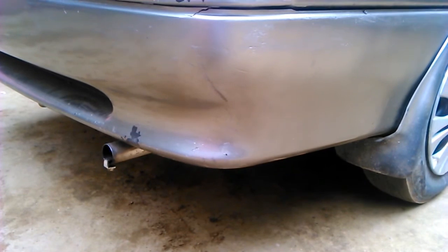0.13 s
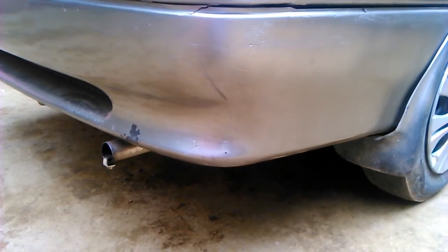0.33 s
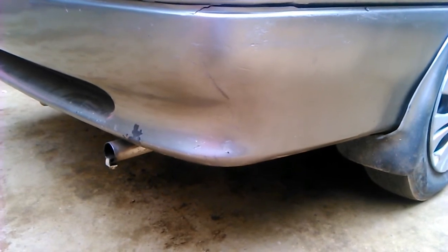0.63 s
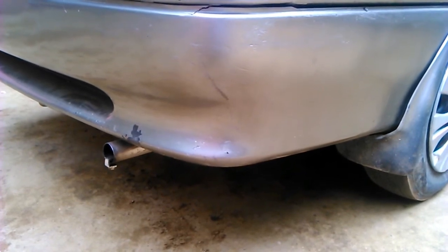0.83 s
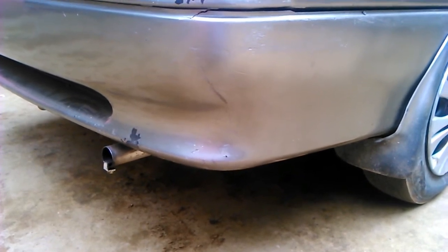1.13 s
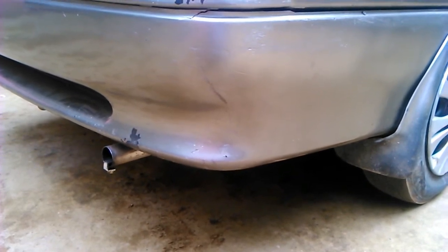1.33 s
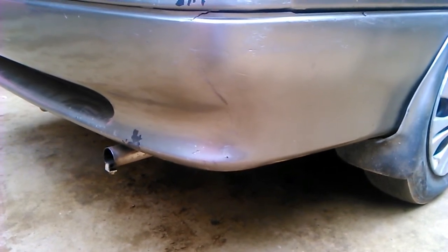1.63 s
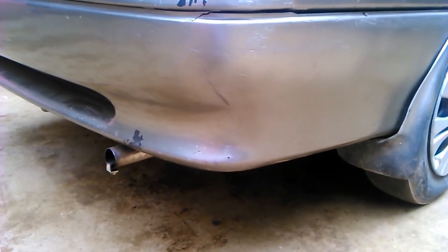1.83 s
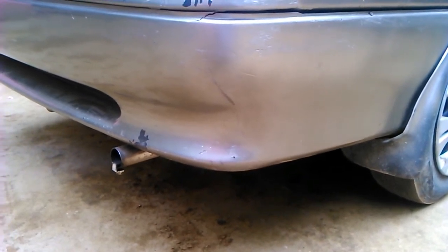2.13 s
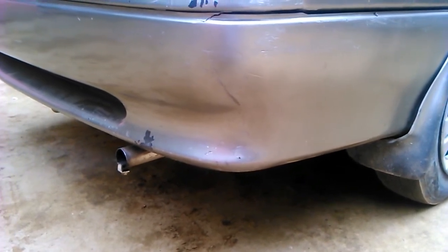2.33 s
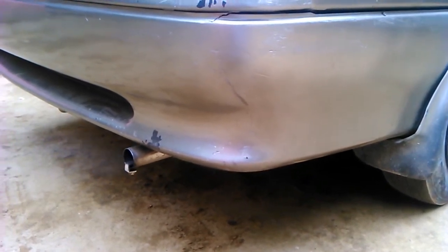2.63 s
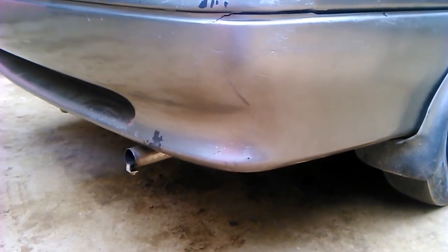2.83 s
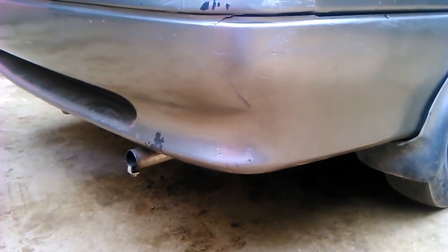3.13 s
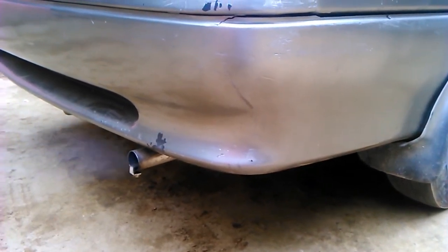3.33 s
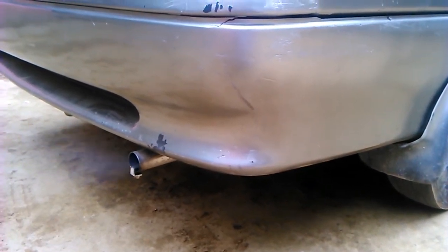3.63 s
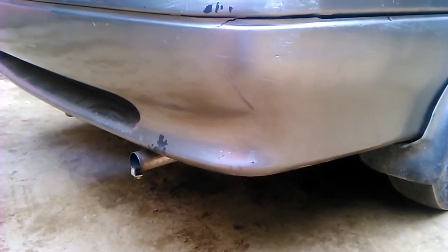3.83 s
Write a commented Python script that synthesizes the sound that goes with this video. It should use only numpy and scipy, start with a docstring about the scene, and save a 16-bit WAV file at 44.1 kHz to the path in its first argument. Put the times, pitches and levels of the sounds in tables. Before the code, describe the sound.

Close outdoors at a tailpipe, a four-cylinder engine revs in repeated bursts; a shrill, breathy, throbbing whistle swells over the rumble, with sputtering chirpy puffs and hissing gas in between, later bursts louder.

```python
"""Outdoors, close microphone: a four-cylinder car revs in short bursts, a whistle in the end of its tailpipe.
With the throttle open the gas jet blows the whistle steadily, throbbing at the firing rate; with it shut,
single uneven firings puff through, each a short chirp with a low thump. The whistle is an edge tone with
a breathy skirt, the engine a stack of sines on the firing rate, the gas noise coloured by the pipe.
A small metallic tick with a fading rustle falls in between."""
import sys
import numpy as np
from scipy import signal
from scipy.fft import rfft, irfft
from scipy.io import wavfile
from scipy.ndimage import uniform_filter1d

SR = 44100
rng = np.random.default_rng(int(sys.argv[2]) if len(sys.argv) > 2 else 0)


def output_pcm(signal):
    """Save a mono or channel-first signal as 16-bit PCM at the path in sys.argv[1].

    Samples are clipped to [-1, 1] before scaling.
    """
    pcm = np.clip(np.atleast_2d(signal).T, -1, 1) * 32767
    wavfile.write(sys.argv[1], SR, np.round(pcm).astype(np.int16))


N = 176400

# Colour of the low and of the high hiss, silent outside: [f/Hz, relative density/dB]
LOW_HISS_COLOUR = [(150, -7), (430, -1.5), (1080, 0), (2100, -0.5), (5000, -17.5)]
HIGH_HISS_COLOUR = [(1700, -0.5), (3000, 1.5), (4200, 0), (5400, -11), (7500, -4.5), (10500, -7),
                    (14500, -18)]
# Resonances of the pipe in both hisses: [f/Hz, width/Hz, lift/dB]
PIPE_RESONANCES = [(733, 122, 7), (1073, 89, 15), (1310.5, 67, 13), (3168, 95, 11), (6040, 1220, 12),
                   (11830, 780, 5.5)]
# The pipe rings on as the gas ebbs: [f/Hz, level over the low hiss/dB]
AFTER_RINGS = [(752, -10), (1360, -7), (1672, -3), (2360, -7), (2810, -8), (3420, -11)]
# Firing of the engine: [t/s, firing rate f/Hz, level of the firing tone/dB]
FIRING = [(0, 50.8, -28), (.13, 73.4, -28), (.25, 88.5, -34), (.3, 87.1, -33.5), (.6, 67.47, -32.5),
          (1.01, 125.6, -23), (1.33, 99.34, -27), (1.7, 70.8, -34.5), (2.03, 62.9, -30.5),
          (2.5, 141.7, -20), (2.54, 135.7, -15), (2.9, 99.4, -25.5), (3.13, 130.4, -20.5),
          (3.34, 153.5, -21.5), (3.38, 149.3, -13.5), (3.62, 121.7, -16.5), (3.81, 103.1, -25),
          (4, 128.3, -22.5)]
# 2nd, 3rd and 4th multiple of the firing rate, for a firing tone of -26.5 dB: [level before silencer/dB]
FIRING_OVERTONES = [-29.5, -35, -39.5]
# Colour that the silencer gives the overtones and quarter orders: [f/Hz, level/dB]
SILENCER = [(20, -7), (80, -6.5), (130, 1), (165, 5), (195, -3), (250, -6.5), (420, -18.5)]
# Lone firings with the throttle shut: [t/s, strength/dB, chirp pitch f/Hz once CHIRP_DECAY_S has passed]
LONE_FIRINGS = [(0.3104, -30, 3870), (0.3596, -24.5, 3330), (0.4016, -18.5, 3550), (0.4474, -19, 3460),
                (0.4942, -27.5, 3700), (0.554, -33.5, 3700), (1.52, -32, 3760), (1.762, -37, 3460),
                (2.017, -34, 3595), (2.771, -26, 3920), (1.1312, -21.5, 3700), (1.1643, -24.5, 3790),
                (1.2018, -21, 3720), (1.2414, -23.5, 3650), (1.278, -26.5, 3680), (1.3192, -22.5, 3700),
                (1.3483, -23, 3494), (1.3935, -22, 3730), (1.4369, -17, 3750), (1.4722, -22.5, 3410),
                (1.5685, -21.5, 3530), (1.6192, -18, 3430), (1.6616, -28, 3510), (1.722, -23, 3350),
                (1.8571, -24.5, 3500), (1.9327, -25, 3360), (1.977, -29.5, 3460), (2.5438, -16, 3900),
                (2.6708, -22, 3860), (2.7316, -13, 3848), (2.8429, -20, 3664), (2.8879, -22.5, 3790),
                (3.5189, -20, 4025), (3.6464, -22, 3760), (3.714, -20.5, 3890), (3.7873, -25, 3550)]
# One table for each burst of throttle: [t/s, whistle pitch f/Hz, whistle level/dB, high hiss level/dB]
BURSTS = [
    [(0, 3830, -36, -45.5), (.2, 3930, -19, -32.5), (.275, 3915, -19.5, -38.5)],
    [(.655, 3742, -33.5, -42), (.76, 3975, -17.5, -31), (.9, 4066, -12, -28), (1.035, 4130, -14, -30.5)],
    [(2.035, 3810, -29.5, -40), (2.25, 4088, -11, -27.5), (2.4, 4135, -10, -22.5),
     (2.515, 4040, -11.5, -24.5)],
    [(2.915, 3910, -22.5, -36), (3.01, 4106, -8.5, -26), (3.315, 4206, -18.5, -20.5),
     (3.335, 4150, -12, -27), (3.36, 4075, -12, -20.5)],
    [(3.815, 3900, -16, -55.5), (3.86, 4115, -10, -28.5), (4, 4166, -10, -23.5)],
]
# After the throttle shuts; rows whistle, low hiss, high hiss: [drop/dB, fade/(dB per s)]
SHUTTING = [(11, 190), (7.5, 39), (11, 84)]
# Overtones of the whistle: [multiple, level/dB against a whistle of +5.5 dB, noise to tone ratio]
WHISTLE_MULTIPLES = [(2, -11, 0.9), (3, -24, 7.5)]
TICK_MODES_HZ = [4200, 4965, 6370, 7560, 12000]

# Hiss and idling
IDLE_LOW_DB, IDLE_HIGH_DB = -44.5, -48.5  # always there
LOW_HISS_DB, LOW_FOLLOWS = -26, 0.88  # level at a high hiss of -28.5 dB, share of its swing in dB
PATCHY_DB = 2  # slow unevenness of both hisses
JET_THROB = 0.58  # throb of the hiss as a share of throb_depth()
IDLE_WHISTLE_HZ, IDLE_WHISTLE_DB = 3620, -50
SIDE_HZ, SIDE_DB = 6000, -7  # treble hiss that differs between the channels
# Tick and rustle
RUSTLE_S, RUSTLE_DB, RUSTLE_FADE_S = 1.808, -38.5, 0.077
TICK_DB, TICK_FADE_S = -37, 0.022  # peak of a mode at 5 kHz
# Engine
OVERTONES_FOLLOW = 0.43  # share of the firing tone's swing in dB
ORDER_WAVER_DB, BETWEEN_WAVER_DB, BURBLE_HZ = 4, 3.5, 25  # the last two: lumpiness with the throttle shut
BETWEEN_OPEN_DB, BETWEEN_SHUT_DB = -42.5, -42  # quarter orders before silencer, throttle open and shut
DUCK = 170  # strength with which the gust of a puff chokes the firing tones
# Puffs
PUFF_ATTACK_S, PUFF_HOLD_S, PUFF_DECAY_S = .002, .015, .006
PUFF_HISS_DB, HISS_FOLLOWS = -39, .3  # hiss of a puff of -23.5 dB, share of its strength in dB
CHIRP_DECAY_S, CHIRP_SAG_HZ_PER_S = .017, 7000
CHIRP_DB, CHIRP_ROUGH = -6, .85  # level against the strength, depth of the random modulation
THUMP_HZ, THUMP_S, THUMP_DB = 62, 0.007, 18  # level against the puff's hiss
# Whistle
THROB, THROB_LAW = 0.29, 0.9  # depth at 100 firings a second, growth towards slower firing
SWING_HZ, FLUTTER_DB = 40, 2  # pitch swing at depth THROB, unevenness at depth 1
BREATH_DB, BREATH_WIDTH_HZ = -21, 230  # skirt, holding its level as the tone weakens


def amp(db):
    """Decibels to gain."""
    return 10 ** (np.asarray(db) / 20)


def rms_one(x):
    """Scale to rms 1."""
    return x / np.sqrt(np.mean(x ** 2) + 1e-20)


def clock():
    """Time in seconds."""
    return np.arange(N) / SR


def in_time(rows):
    """Columns of a table as curves in time."""
    s, *columns = np.transpose(rows)
    return [np.interp(clock(), s, column) for column in columns]


def at_hz(points, hz):
    """Read a colour table, straight in dB over log frequency."""
    table_hz, db = np.transpose(points)
    return np.interp(np.log(hz), np.log(table_hz), db)


def drift(rate_hz):
    """Slow chance, spread 1: noise through a two-pole low-pass at a twentieth of the sample rate."""
    pole = np.exp(-40 * np.pi * rate_hz / SR)
    noise = rng.standard_normal(N // 20 + 2002)
    slow = signal.lfilter([1], [1, -2 * pole, pole * pole], noise)[2000:]  # settled part
    return np.interp(np.arange(N) / 20, np.arange(len(slow)), rms_one(slow))


def narrow_noise(hz, width_hz):
    """A resonance kept ringing by turbulence, rms 1."""
    turn = 2 * np.pi * hz * clock()
    return drift(width_hz) * np.sin(turn) + drift(width_hz) * np.cos(turn)


def throttle():
    """1 while open, 0 while shut, with short smoothed passages."""
    t = clock()
    is_open = sum(1. * (t > burst[0][0]) * (t <= burst[-1][0]) for burst in BURSTS)
    return uniform_filter1d(is_open, size=900)


def blown(index):
    """Gain of whistle (0), low (1) or high hiss (2): the jet swells, then drops and fades on shutting."""
    t, gain = clock(), 0
    drop_db, fade = SHUTTING[index]
    for burst in BURSTS:
        s, _, tone_db, hiss_db = np.transpose(burst)
        low_db = LOW_HISS_DB + LOW_FOLLOWS * (hiss_db + 28.5)
        db = np.interp(t, s, [tone_db, low_db, hiss_db][index])
        loss_db = (t > s[-1]) * (drop_db + fade * (t - s[-1]))
        onset = np.clip((t - s[0]) / 0.014, 0, 1)
        gain = gain + onset * amp(db - loss_db)
    return uniform_filter1d(gain, size=260)


def throb_depth():
    """Slower firing throbs deeper."""
    firing_hz = in_time(FIRING)[0]
    return np.minimum(THROB * (100 / firing_hz) ** THROB_LAW, 1)


def idle_whistle():
    """The idling gas breathes faintly over the whistle."""
    return amp(IDLE_WHISTLE_DB) * narrow_noise(IDLE_WHISTLE_HZ, width_hz=200.0)


def after_ring():
    """The pipe rings on, grainy, while the gas ebbs behind the shut throttle."""
    rings = sum(amp(db) * narrow_noise(hz, width_hz=45.0) for hz, db in AFTER_RINGS)
    return blown(index=1) * (1 - throttle()) * rings


def struck_decay(fade_s):
    """Exponential fade that starts at the tick."""
    t = clock()
    return (t > RUSTLE_S) * np.exp(-np.abs(t - RUSTLE_S) / fade_s)


def tick():
    """A small metallic tick: decaying modes, the higher the weaker."""
    modes = sum(5000 / hz * np.sin(2 * np.pi * hz * clock()) for hz in TICK_MODES_HZ)
    return amp(TICK_DB) * modes * struck_decay(TICK_FADE_S)


def hiss(colour):
    """Turbulence: noise with a colour and the ringing of the pipe, rms 1."""
    hz = np.maximum(np.fft.rfftfreq(N, 1 / SR), 1)
    lift = 1 + sum((amp(db) - 1) / (1 + (2 * (hz - f) / width) ** 2) for f, width, db in PIPE_RESONANCES)
    inside = (hz > colour[0][0]) & (hz < colour[-1][0])
    spectrum = rfft(rng.standard_normal(N)) * amp(at_hz(colour, hz)) * lift * inside
    return rms_one(irfft(spectrum, N))


def hiss_gains(turn, gust):
    """Gains of low and high hiss: the jet throbs with the firings; puffs and rustle add in power."""
    throb = 1 + JET_THROB * throb_depth() * np.cos(turn)
    low_jet = (blown(index=1) + amp(IDLE_LOW_DB)) * amp(PATCHY_DB * drift(7.2)) * throb
    high_jet = (blown(index=2) + amp(IDLE_HIGH_DB)) * amp(PATCHY_DB * drift(4.8)) * throb
    rustle = amp(RUSTLE_DB) * struck_decay(RUSTLE_FADE_S)
    return np.hypot(low_jet, gust), np.hypot(high_jet, gust + rustle)


def engine(turn, gust):
    """Firing tone, its overtones, and quarter orders from cylinders that fire unevenly."""
    hz, tone_db = in_time(FIRING)
    is_open = throttle()

    def order(k, db):
        start = rng.uniform(0, 2 * np.pi)
        return amp(db + at_hz(SILENCER, k * hz)) * np.sin(k * turn + start)

    tones = amp(tone_db) * np.sin(turn)
    for k, db in enumerate(FIRING_OVERTONES, start=2):
        swing_db = OVERTONES_FOLLOW * (tone_db + 26.5)
        tones += order(k, db + swing_db + ORDER_WAVER_DB * drift(10.4))
    tones /= 1 + DUCK * uniform_filter1d(gust, size=300)

    between_db = BETWEEN_SHUT_DB + is_open * (BETWEEN_OPEN_DB - BETWEEN_SHUT_DB)
    for quarter in range(1, 14):
        if quarter % 4:  # whole orders are already there
            lumps_db = BETWEEN_WAVER_DB * (1 - is_open) * drift(BURBLE_HZ)
            tones += order(quarter / 4, between_db + ORDER_WAVER_DB * drift(7.2) + lumps_db)
    return np.sqrt(2) * tones


def puffs():
    """Each lone firing: a sagging rough chirp and a low thump; also the envelope of its hiss."""
    out, gust = np.zeros(N + SR), np.zeros(N + SR)
    t = np.arange(SR // 12) / SR
    rise = np.minimum(t / PUFF_ATTACK_S, 1)
    chirp_envelope = rise * np.exp(-(t / CHIRP_DECAY_S) ** 2)
    gust_envelope = rise * np.exp(-np.maximum(t - PUFF_HOLD_S, 0) / PUFF_DECAY_S)
    knock = np.sin(2 * np.pi * THUMP_HZ * t) + np.sin(2 * np.pi * 2.95 * THUMP_HZ * t)
    thump = knock * np.exp(-t / THUMP_S)
    # complex, so that both level and phase of the chirp are rough
    rough = np.append(1 + CHIRP_ROUGH * (drift(200.0) + 1j * drift(200.0)), np.zeros(SR))
    for s, db, hz in LONE_FIRINGS:
        at = slice(int(s * SR), int(s * SR) + len(t))
        hiss_db = PUFF_HISS_DB + HISS_FOLLOWS * (db + 23.5)
        cycles = hz * t - .5 * CHIRP_SAG_HZ_PER_S * (t - CHIRP_DECAY_S) ** 2
        chirp = np.imag(rough[at] * np.exp(2j * np.pi * cycles))
        out[at] += amp(db + CHIRP_DB) * chirp_envelope * chirp
        out[at] += amp(hiss_db + THUMP_DB) * thump
        gust[at] += amp(hiss_db) * gust_envelope
    return out[:N], gust[:N]


def whistle(turn):
    """An edge tone that swells and rises with every firing, with a breathy skirt."""
    hz = in_time(np.concatenate(BURSTS))[0]
    depth, level = throb_depth(), blown(index=0)
    swing_hz = SWING_HZ * (depth / THROB) ** 2 * np.cos(turn)
    phase = 2 * np.pi * np.cumsum(hz + swing_hz) / SR
    throb = (1 + depth * np.cos(turn)) / np.sqrt(1 + depth ** 2 / 2)  # constant power
    flutter = amp(FLUTTER_DB * depth * drift(40.0))
    breath = np.minimum(amp(BREATH_DB) / (level + 1e-6), 2)
    out = 0
    for k, db, noisy in [(1, 0, breath)] + WHISTLE_MULTIPLES:
        in_phase = (1 + noisy * drift(BREATH_WIDTH_HZ)) * np.sin(k * phase)
        quadrature = noisy * drift(BREATH_WIDTH_HZ) * np.cos(k * phase)
        partial = (in_phase + quadrature) / np.sqrt(1 + 2 * noisy ** 2)
        brightness = np.sqrt(level / amp(5.5)) if k > 1 else 1  # overtones grow with the blowing
        out = out + amp(db) * brightness * partial
    return np.sqrt(2) * level * throb * flutter * out


def scene():
    """All sources in the middle; the treble differs slightly between the channels."""
    turn = 2 * np.pi * np.cumsum(in_time(FIRING)[0]) / SR  # one turn per firing
    chirps, gust = puffs()
    low, high = hiss_gains(turn, gust)
    mid = idle_whistle() + after_ring() + tick()
    mid += low * hiss(LOW_HISS_COLOUR) + high * hiss(HIGH_HISS_COLOUR)
    mid += engine(turn, gust) + chirps + whistle(turn)
    treble_only = signal.butter(6, SIDE_HZ, "high", fs=SR, output="sos")
    side = signal.sosfilt(treble_only, amp(SIDE_DB) * high * hiss(HIGH_HISS_COLOUR))
    return np.array([mid + side, mid - side])


def record(dry):
    """Microphone chain: peaks common to both channels are rounded; bottom and top are cut."""
    mid = dry.mean(axis=0)
    rounded = dry - mid + 1.2 * np.tanh(mid / 1.2)
    no_bottom = signal.lfilter([1, -1], [1, -.997], rounded)  # high-pass near 21 Hz
    top_cut = signal.cheby2(20, 50, 14450, fs=SR, output="sos")  # 50 dB down from 14450 Hz
    return signal.sosfilt(top_cut, no_bottom)


dry = scene()
out = record(dry)
output_pcm(out)
```